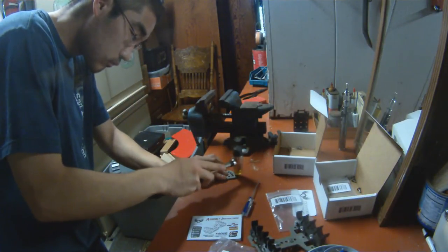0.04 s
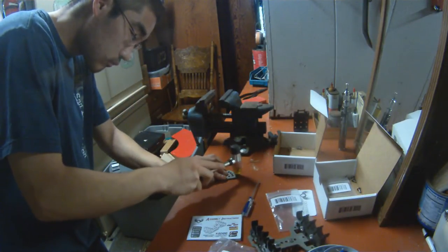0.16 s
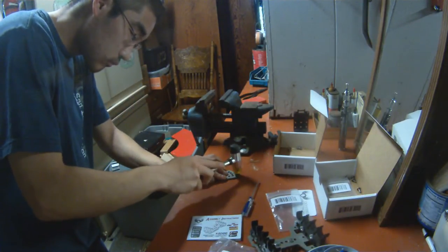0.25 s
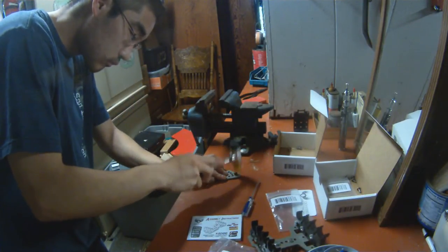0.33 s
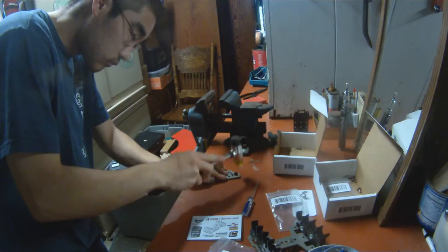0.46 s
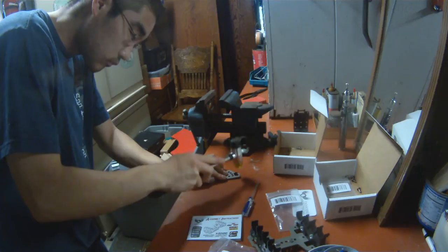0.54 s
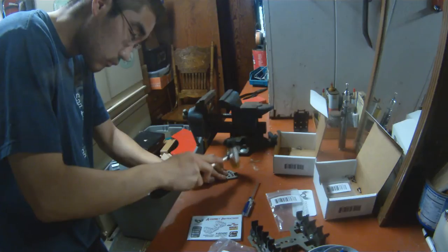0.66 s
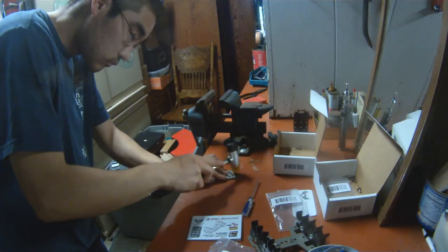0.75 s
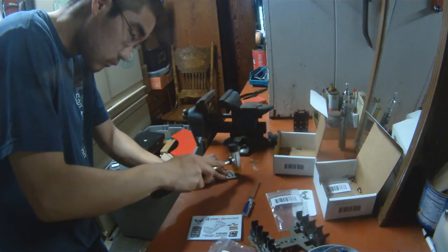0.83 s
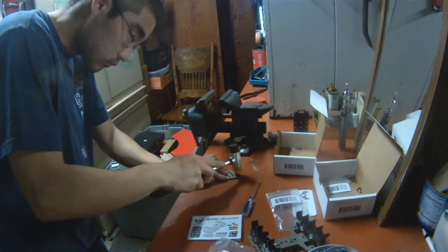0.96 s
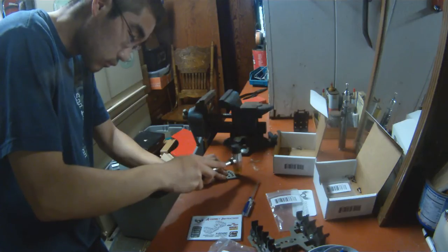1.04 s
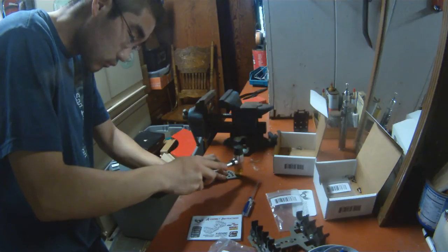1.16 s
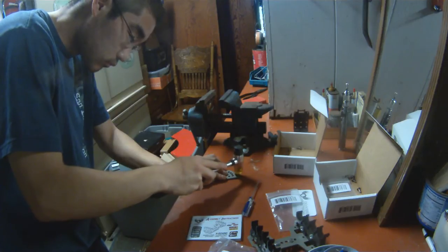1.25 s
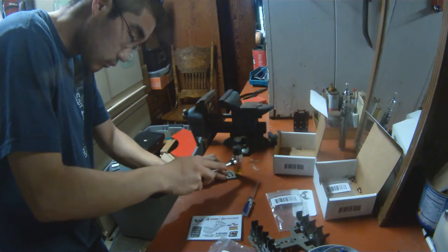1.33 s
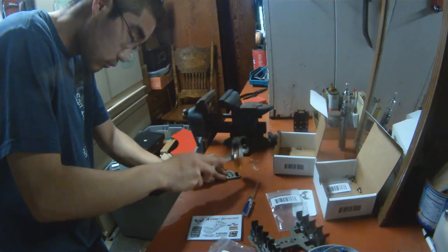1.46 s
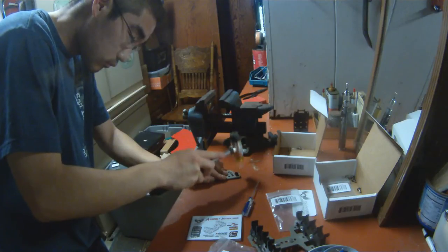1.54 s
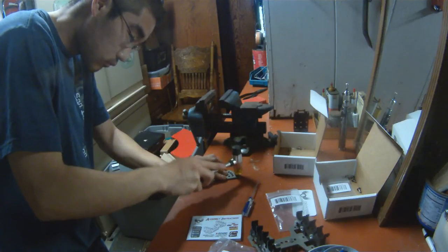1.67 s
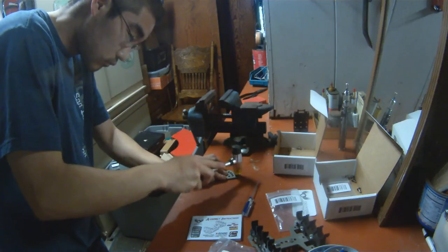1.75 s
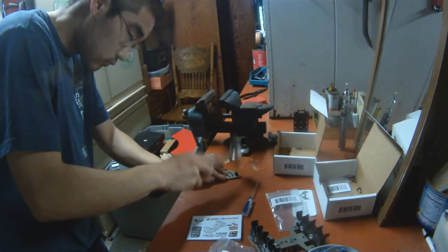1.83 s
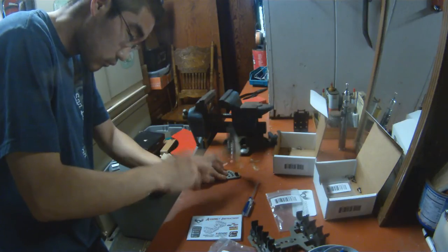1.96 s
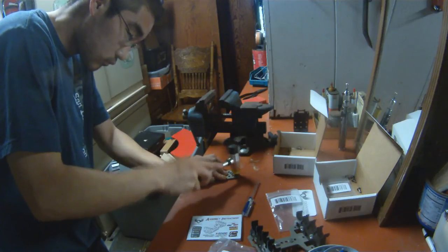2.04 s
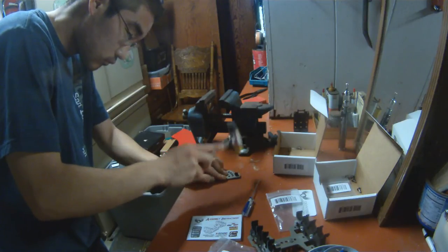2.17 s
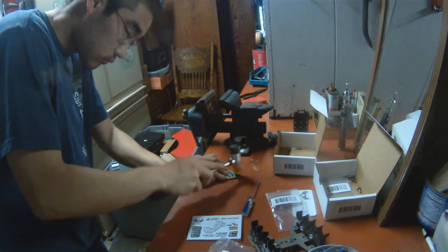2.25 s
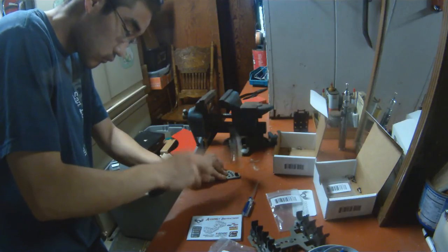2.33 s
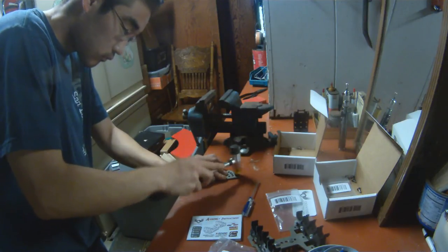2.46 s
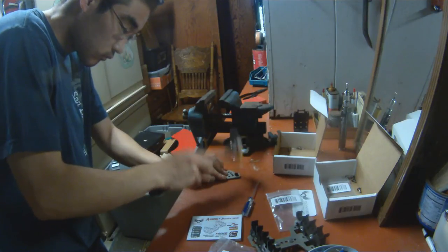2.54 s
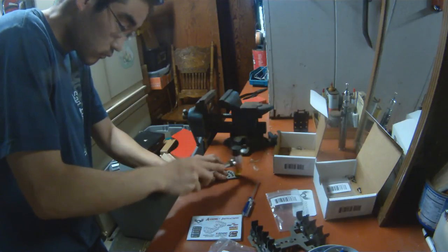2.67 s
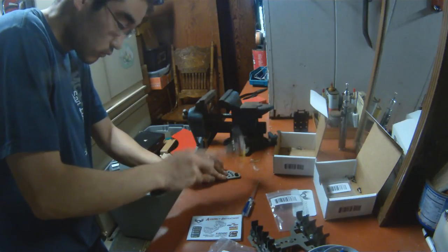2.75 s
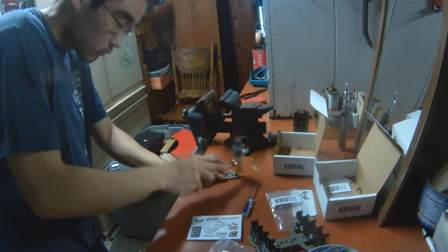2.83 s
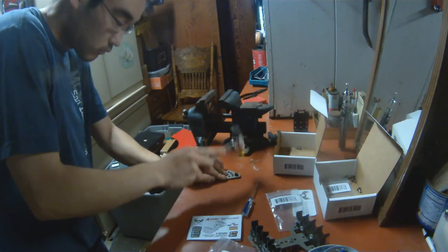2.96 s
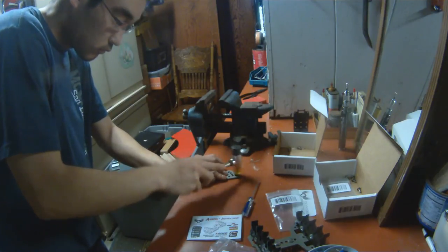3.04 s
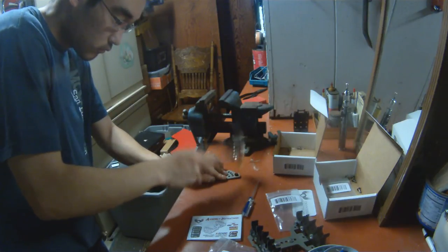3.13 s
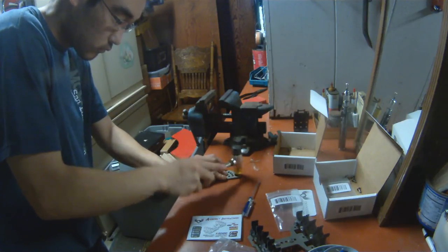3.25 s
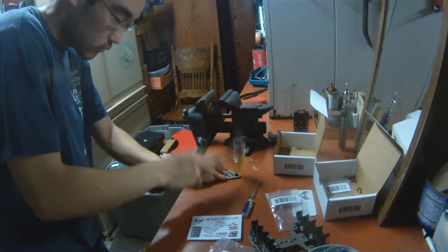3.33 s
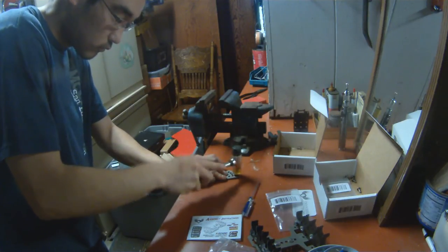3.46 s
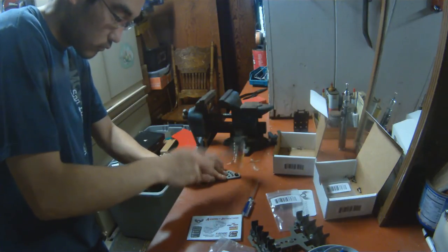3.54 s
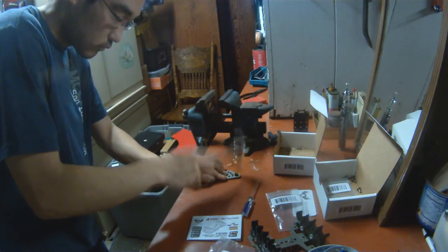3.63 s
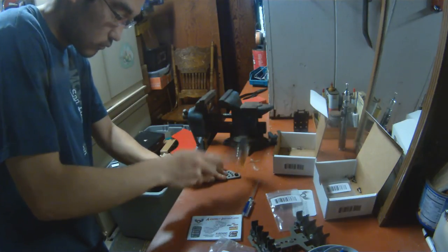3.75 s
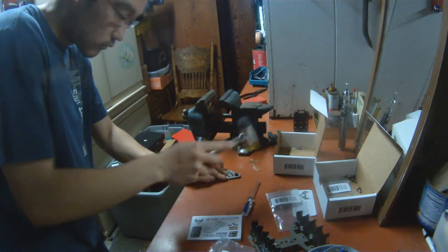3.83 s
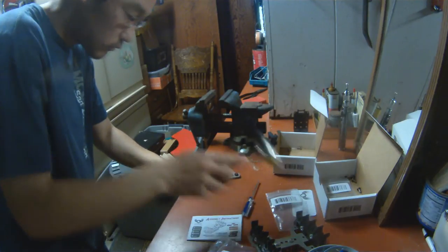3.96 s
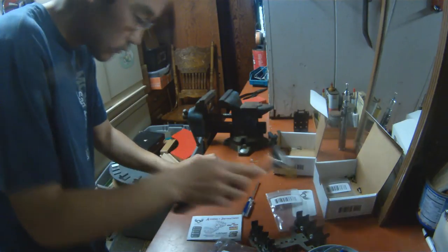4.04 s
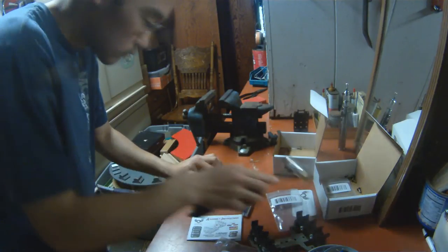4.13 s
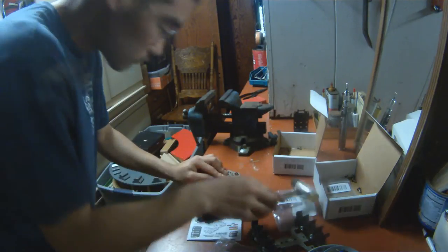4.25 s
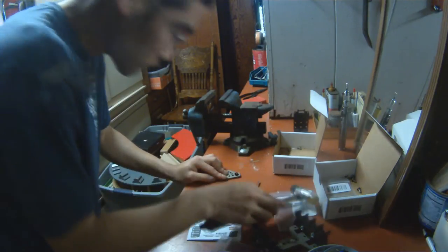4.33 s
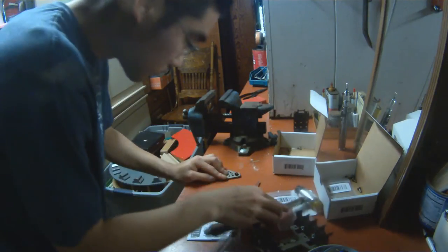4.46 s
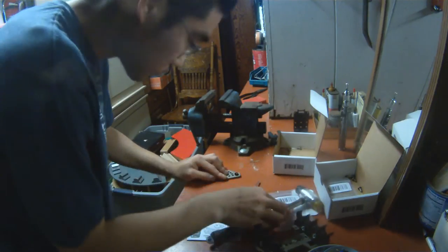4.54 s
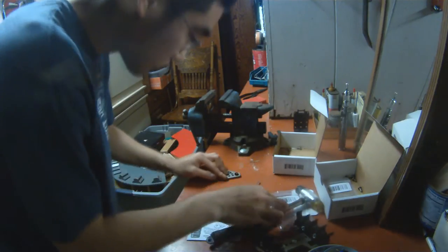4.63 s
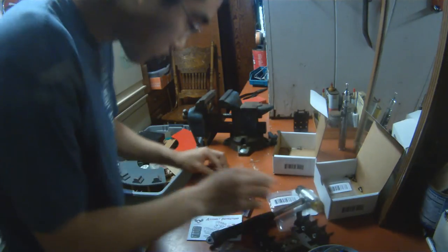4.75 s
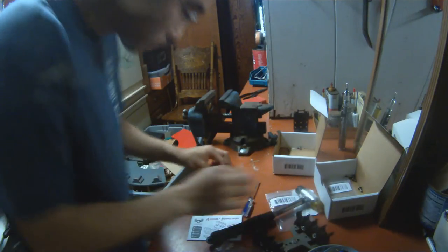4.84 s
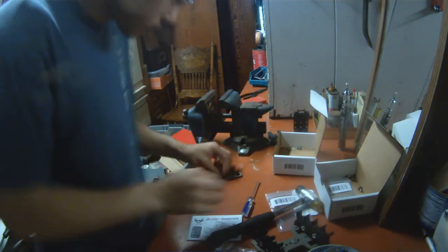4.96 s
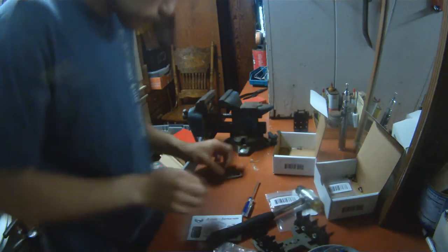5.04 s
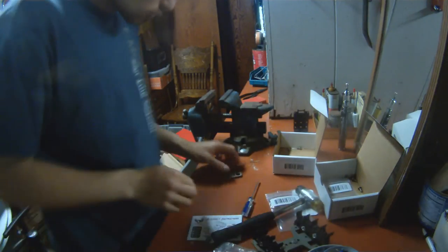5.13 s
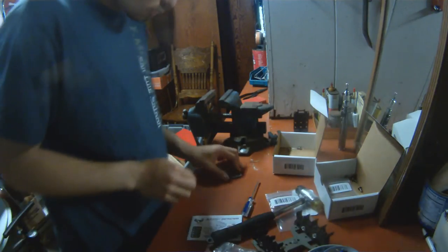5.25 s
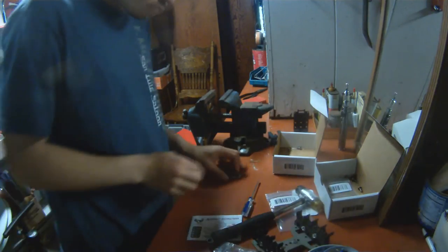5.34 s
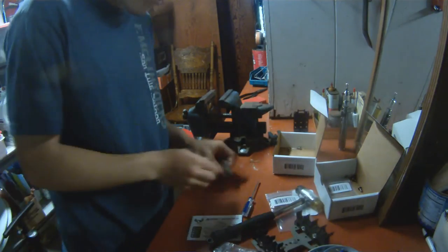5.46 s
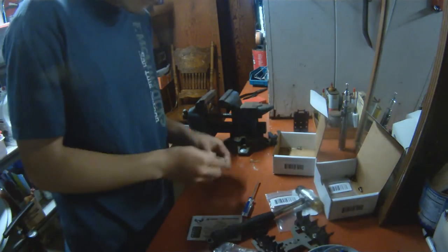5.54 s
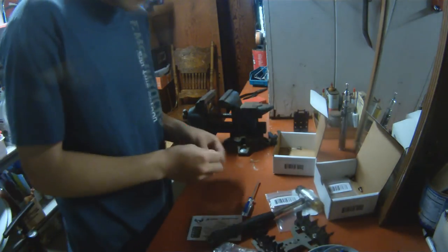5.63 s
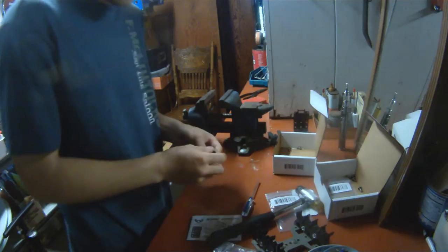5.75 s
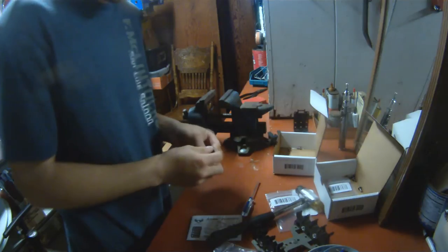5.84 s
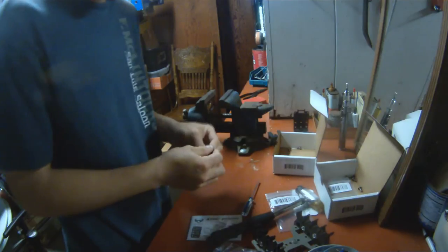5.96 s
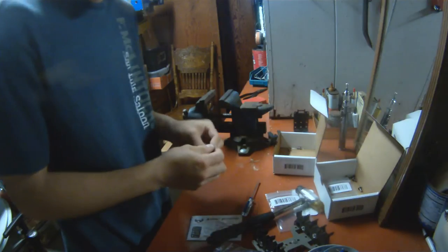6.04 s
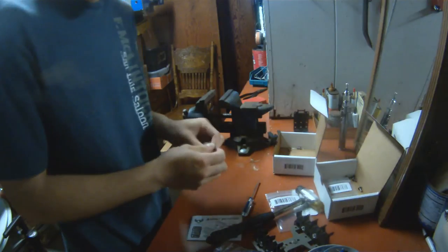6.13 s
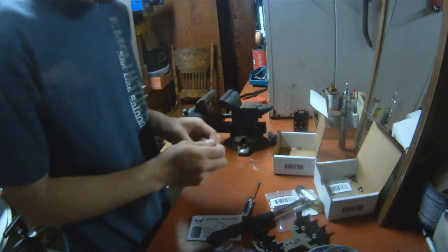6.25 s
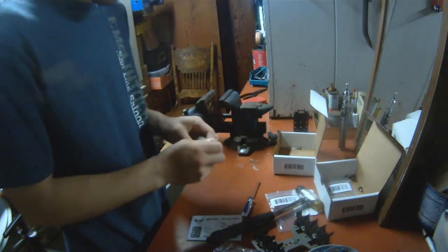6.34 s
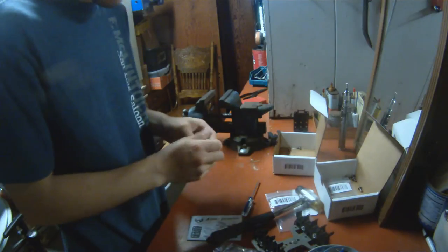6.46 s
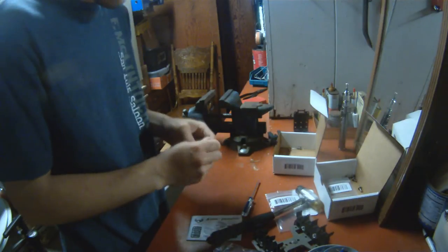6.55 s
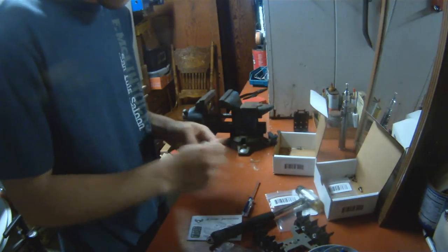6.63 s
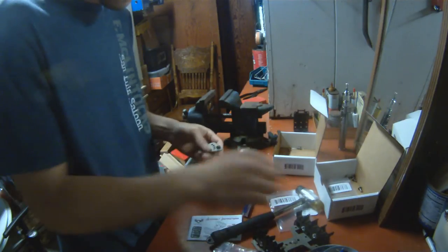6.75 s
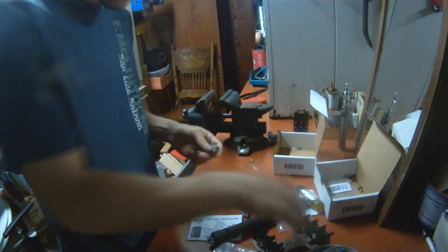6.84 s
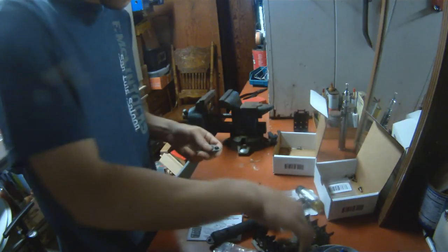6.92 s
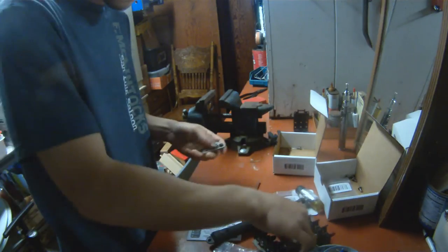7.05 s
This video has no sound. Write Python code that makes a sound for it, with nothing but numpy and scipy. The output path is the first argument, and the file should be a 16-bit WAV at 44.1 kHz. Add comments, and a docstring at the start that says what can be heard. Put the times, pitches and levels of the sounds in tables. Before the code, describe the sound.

Quick, snappy hammer knocks on a wooden bench, then a tool clattering down and faint ticks of small steel parts over hiss.

```python
"""Single knocks, then a quick run: a plastic hammer taps a tight plastic part onto a post on a wooden
workbench. Each blow rings the bench top, snaps at the plastic face and leaves the bench humming low.
The hammer is laid down with a clatter, small steel parts tick in the fingers, and a hand lands among
the tools. A small workshop, heard through one hissy camera microphone that turns down on loud blows."""
import sys
import numpy as np
from scipy import signal
from scipy.fft import rfft, irfft
from scipy.io import wavfile
from scipy.ndimage import uniform_filter1d

SR = 44100
rng = np.random.default_rng(int(sys.argv[2]) if len(sys.argv) > 2 else 0)


def unload_wav(signal):
    """Save mono or channel-first audio to the path in sys.argv[1] as 16-bit WAV at rate SR, clipped to [-1, 1]."""
    wavfile.write(
        sys.argv[1],
        SR,
        np.round(np.clip(np.atleast_2d(signal).T, -1, 1) * 32767).astype(np.int16),
    )


N = 312662
EVENT_SAMPLES = 32768
EVENT_T, SCENE_T = np.arange(EVENT_SAMPLES) / SR, np.arange(N) / SR
BIN_HZ = np.fft.rfftfreq(EVENT_SAMPLES, 1 / SR) + 1e-3

# Steady background. Each row: frequency in Hz, relative density in dB.
HISS_SPECTRUM = [(15, -50.5), (25, -19), (69, -2), (103, -6.5), (202, 1.5), (264, -4), (344, -3), (558, -4),
                 (856, -6), (1630, -8), (3090, -10.5), (13800, -17.5), (15000, -18)]
# Workshop reverberation. Each row: frequency in Hz, t60 in seconds.
ROOM_DECAY = [(80, 0.1806), (200, 0.35), (500, .21), (1200, 0.22), (4000, 0.18), (8000, .13),
              (15000, 0.067)]
# Small steel parts touching. Each row: start in seconds, relative level in dB, rise in seconds,
# scrape t60 in seconds, ring frequency in Hz, ring trim in dB.
PART_TICKS = [(5.087, -21.5, .004, 0.065, 12500, -6), (5.334, -21, 0.00044, 0.04, 9050, -12),
              (5.452, -20, .02, 0.075, 7500, -4)]
# Soft thuds of hand and handle. Each row: start in seconds, gain in dB.
SOFT_THUDS = [(.002, -45), (.826, -38.5), (1.147, -48.5), (4.616, -20), (7.048, -31)]
# Hammer and parts set down. Each row: start in seconds, force in dB, hardness from 0 to 1.
SET_DOWNS = [(.825, -45.5, .6), (4.45, -30.5, 0), (4.4638, -13, 0.8), (4.4824, -17, 1), (4.556, -18, 1),
             (4.5653, -21, 0.85), (4.580, -22.5, 0.5), (4.615, -14.5, 0), (4.6221, -24, 0)]
# Hammer blows. Each row: start in seconds, force in dB, contact corner in Hz, knock in dB, snap in dB.
HAMMER_BLOWS = [(1.7255, -2.5, 857, 4, -8), (2.0705, 1.9, 1100, -1.5, -5), (2.3224, 2, 1860, -2.5, -4.5),
                (2.5246, 2, 2260, -5.5, 1.5), (2.723, -0.5, 1480, -9, 0), (2.9172, 5, 1050, -5, 3),
                (3.1115, 4.5, 1250, 1.5, 5.5), (3.3236, 5.5, 1460, 3, 2.5), (3.5303, 5.5, 1280, 3.5, 6.5),
                (3.7304, 5.5, 1260, 3, 6)]

# Contact noise. Each row: frequency in Hz, gain in dB.
RUB_SPECTRUM = [(80, -29), (300, 1), (800, -0.5), (1050, -2), (1450, 1), (2200, -4.5), (4000, -10),
                (9000, -11.5), (16000, -25)]  # fingers on small parts
SLIDE_SPECTRUM = [(80, -17), (260, 7), (450, -1), (620, 7), (800, -12.5), (1050, -7.5), (1800, -13.5),
                  (3000, -25.5), (16000, -37)]  # hammer or hand sliding on the bench
CLACK_SPECTRUM = [(100, -11), (240, 35.5), (380, 8), (650, 32), (1100, 24.5), (2100, 19.5), (2900, 0),
                  (4600, 7), (5900, -4.5), (7300, 2), (9000, -10), (15000, -13)]  # things set down
SNAP_SPECTRUM = [(300, -21.5), (1500, 11.5), (2300, 3.5), (3300, 3), (4400, 1), (5400, -3), (7700, -2.5),
                 (9500, -5), (12000, -5), (14000, -7), (16000, -12)]  # plastic face on the part

# Loaded bench top. Each row: frequency in Hz, nominal width in Hz, gain in dB.
BENCH_MODES = [(78.03, 5.6, 25), (123, 11, 30.5), (139.6, 9.2, 29), (164.6, 21, 31), (248, 13, 28.5),
               (270, 110, 25), (323.5, 6.4, 25.5), (347.3, 45, 34.5), (425.9, 78, 33), (498.7, 37, 33.5),
               (550, 10, 31.5), (582, 68, 31.5), (684, 56.5, 31.5), (764.4, 68, 28), (810.6, 15, 29.5),
               (941, 66, 32.5), (1085, 43, 30), (1130, 6.4, 25.5), (1300, 71, 29.5), (1410, 98, 28.5),
               (1466, 16, 32.5), (1615, 90, 26.5), (1700, 100, 28.5), (1964, 31.3, 25), (2011, 35, 26),
               (2131, 280, 23), (2510, 187, 21.5), (2860, 550, 24)]
# Ringing bodies. Each row: frequency in Hz, relative level in dB, t60 in seconds.
TOOL_MODES = [(1668, -42.5, 0.068), (2595, -50.5, .12), (3780, -50.5, 0.18), (5356, -61.5, .2)]  # nudged steel tool
THUD_MODES = [(94, -10, 0.2), (148, 2, 0.12), (247, 2, 0.067), (285.3, 0, 0.11), (616, -13.5, 0.083)]  # bench under a soft thud
HUM_MODES = [(96.07, -53.5, 5.0), (199.2, -56.5, 2.1), (319, -41, .36), (489, -19.5, .24)]  # long low ring of the bench
HEAD_MODES = [(6460, -44.5, .02), (7800, -43, 0.044), (7720, -41.5, .042)]  # steel hammer head
POST_MODES = [(4370, -21, 0.00818)]  # post under the part


def amp(db):
    """Decibels to gain."""
    return 10 ** (np.asarray(db) / 20)


def fade(t, t60_s):
    """Exponential decay, 60 dB in t60_s."""
    return np.exp(-np.log(1000) * t / t60_s)


def along(points, hz):
    """Interpolate (Hz, value) rows on a log axis."""
    point_hz, values = np.transpose(points)
    return np.interp(np.log(hz + 1), np.log(point_hz), values)


def between(at_0, at_1, share):
    """Linear blend, clamped at both ends."""
    return at_0 + (at_1 - at_0) * np.clip(share, 0, 1)


def band(hz, centre_hz, width_oct):
    """Gaussian bump on an octave axis, peak 1."""
    return np.exp(-(np.log2(hz / centre_hz) / width_oct) ** 2)


def add(track, start_s, sound):
    """Mix a sound into a track."""
    start = max(round(start_s * SR), 0)
    track[start:start + len(sound)] += sound[:N - start]


def minimum_phase(gain):
    """Causal response with this gain, by folding the cepstrum."""
    cepstrum = irfft(np.log(np.maximum(gain, 1e-6)))
    cepstrum[1:EVENT_SAMPLES // 2] *= 2
    cepstrum[EVENT_SAMPLES // 2 + 1:] = 0
    return np.exp(rfft(cepstrum))


def burst(envelope, spectrum):
    """Enveloped noise, set to unit energy, then coloured."""
    noise = envelope * rng.standard_normal(EVENT_SAMPLES)
    return irfft(rfft(noise / np.linalg.norm(noise)) * minimum_phase(amp(along(spectrum, BIN_HZ))))


def ring(modes, t=EVENT_T):
    """Sum of damped sines."""
    return sum(amp(db) * fade(t, t60_s) * np.sin(2 * np.pi * hz * t) for hz, db, t60_s in modes)


def hiss(level_db=-57.5):
    """Coloured noise common to both channels, plus weaker white noise in opposite phase."""
    colour = amp(along(HISS_SPECTRUM, np.fft.rfftfreq(N, 1 / SR)))
    mid = irfft(rfft(rng.standard_normal(N)) * colour, N)
    side = amp(-7.5) * rng.standard_normal(N)
    return (mid / mid.std() + np.array([side, -side])) * amp(level_db)


def workshop(direct, build_s=0.0034, low_cut_hz=330):
    """Near walls answer within milliseconds; the reverberation has little bass; treble dies first."""
    hz, t, bins = signal.stft(rng.standard_normal(EVENT_SAMPLES), SR, nperseg=256)
    bins = bins * fade(t, along(ROOM_DECAY, hz)[:, None])
    tail = signal.istft(bins, SR, nperseg=256)[1][:EVENT_SAMPLES]
    tail *= 1 - np.exp(-(EVENT_T / build_s) ** 2)
    tail = signal.sosfilt(signal.butter(2, low_cut_hz, "high", fs=SR, output="sos"), tail)
    return signal.fftconvolve(direct, tail / np.linalg.norm(tail))[:N]


def small_parts():
    """Steel parts touch in the fingers: each a brief scrape with one high ring."""
    track = np.zeros(N)
    for start_s, level_db, rise_s, t60_s, ring_hz, ring_db in PART_TICKS:
        swell = 1 - np.exp(-EVENT_T / rise_s)
        scrape = amp(6.5) * burst(swell * fade(EVENT_T, t60_s), RUB_SPECTRUM)
        tone = swell * ring([(ring_hz, 0, .1)])
        tone *= amp(ring_db - 5.5) / np.linalg.norm(tone)
        add(track, start_s, amp(level_db) * (scrape + tone))
    return track


def strike(force_db, thump_db, knock_db, corner_hz, snap_db, steel_db, snap_spectrum, scatter_db):
    """One contact: a short push rings the bench, the hard faces snap, the hammer head pings."""
    scatter = amp(scatter_db * rng.standard_normal(len(BENCH_MODES)))
    wood = 0
    for k, (hz, width_hz, db) in enumerate(BENCH_MODES):
        damping = 1j * BIN_HZ * max(width_hz, 0.023 * hz)  # wood losses set a minimum width
        wood += (-1) ** k * scatter[k] * amp(db) * damping / (hz ** 2 - BIN_HZ ** 2 + damping)
    # The spot hit weights the thump of the whole top and the knock of the board.
    spot = amp(thump_db * band(BIN_HZ, 140, 0.32) + knock_db * band(BIN_HZ, 1000, .5))
    # Longer contact cuts treble. Below about 73 Hz everything falls off steeply.
    push = 1 / np.sqrt((1 + (BIN_HZ / corner_hz) ** 10) * (1 + (73 / BIN_HZ) ** 10))
    bench = irfft(wood * minimum_phase(spot * push))
    # The slower decay is scatter off the bench clutter.
    snap = burst(fade(EVENT_T, .012) + 0.34 * fade(EVENT_T, 0.069), snap_spectrum)
    return amp(force_db) * bench + amp(snap_db) * snap + amp(steel_db) * ring(HEAD_MODES)


def handling(slide_s=4.358, nudge_s=7.039, brush_s=7.047):
    """Hard things clack, soft ones thud; the hammer slides; a hand nudges a tool, brushes the bench."""
    track = np.zeros(N)
    for start_s, force_db, hardness in SET_DOWNS:
        contact = strike(force_db, thump_db=between(4, -2, hardness), knock_db=-1.5,
                         corner_hz=between(890, 2000, hardness),
                         snap_db=force_db + between(-10.5, 7.5, hardness),
                         steel_db=force_db + between(-9, 15, hardness),
                         snap_spectrum=CLACK_SPECTRUM, scatter_db=5.5)
        add(track, start_s, contact)
    thud = ring(THUD_MODES) * (1 - fade(EVENT_T, 0.025)) ** 2
    for start_s, gain_db in SOFT_THUDS:
        add(track, start_s, amp(gain_db) * thud)
    slide_swell = np.exp(-((EVENT_T - 0.039) / 0.028) ** 2)
    add(track, slide_s, amp(5.5) * burst(slide_swell, SLIDE_SPECTRUM))
    add(track, nudge_s, ring(TOOL_MODES) * (1 - fade(EVENT_T, .02)))
    add(track, brush_s, amp(-1) * burst(fade(EVENT_T, t60_s=0.041), SLIDE_SPECTRUM))
    return track


def hammer(loose_s=2.5, seated_s=3.3, hum_rise_s=.03):
    """Blows drive the part home; each clicks the post and feeds the bench's low hum."""
    track = np.zeros(N)
    hum = ring(HUM_MODES, SCENE_T) * (1 - fade(SCENE_T, hum_rise_s)) ** 2
    for start_s, force_db, corner_hz, knock_db, snap_db in HAMMER_BLOWS:
        # A loose part thumps and bites; a seated one is dry.
        seated = (start_s - loose_s) / (seated_s - loose_s)
        thump_db, bite_db = between(1.5, -3.5, seated), between(3, -4, seated)
        spectrum = [(hz, db + bite_db * band(hz, 3100, 0.57)) for hz, db in SNAP_SPECTRUM]
        steel_db = -8.5 + 2.6 * force_db  # head and post answer hard blows far more
        blow = strike(force_db, thump_db, knock_db, corner_hz, snap_db, steel_db, spectrum,
                      scatter_db=1.5)
        add(track, start_s, blow)
        add(track, start_s, amp(steel_db) * ring(POST_MODES))
        add(track, start_s, amp(force_db) * hum)
    return track


def scene():
    """Bench sounds and their reverberation, near centre, over the hiss."""
    direct = hammer() + handling() + small_parts()
    balance_db = [[-.1], [.1]]
    return (direct + amp(-10.5) * workshop(direct)) * amp(balance_db) + hiss()


def gain_control(x, threshold_db=-13.5, meter_s=0.017, attack_s=.06):
    """Each new peak above threshold lowers the gain for good: the hiss sinks in steps."""
    power = np.abs(uniform_filter1d(x.mean(axis=0) ** 2, round(meter_s * SR)))
    excess_db = np.maximum(10 * np.log10(power + 1e-12) - threshold_db, 0)
    cut_db = np.maximum.accumulate(excess_db)
    pole = np.exp(-1 / (attack_s * SR))
    return x * amp(-signal.lfilter([1 - pole], [1, -pole], cut_db))


def record(dry, low_cut_hz=25, top_hz=15500, ceiling=.8):
    """Camera input: bass cut, gain control, soft clipping, band limit."""
    low_cut = signal.butter(1, low_cut_hz, "high", fs=SR, output="sos")
    levelled = gain_control(signal.sosfilt(low_cut, dry))
    rounded = levelled / (1 + (np.abs(levelled) / ceiling) ** 6) ** (1 / 6)
    return signal.sosfilt(signal.ellip(10, .1, 90, top_hz, fs=SR, output="sos"), rounded)


dry = scene()
out = record(dry)
unload_wav(out)
```